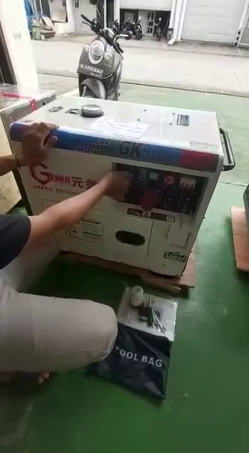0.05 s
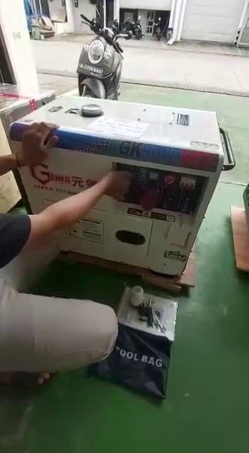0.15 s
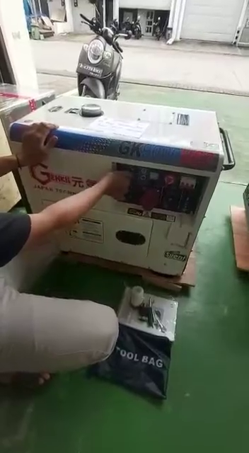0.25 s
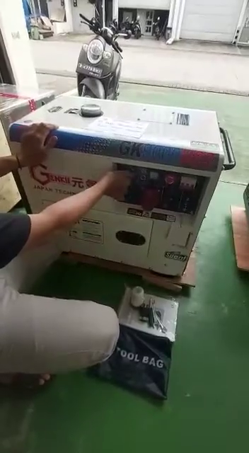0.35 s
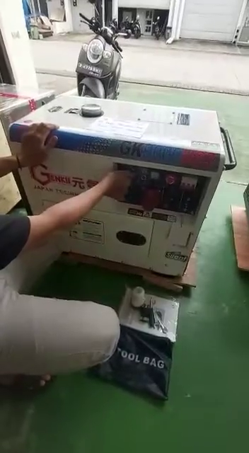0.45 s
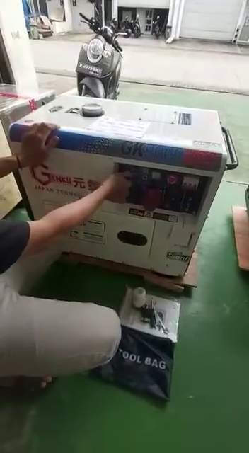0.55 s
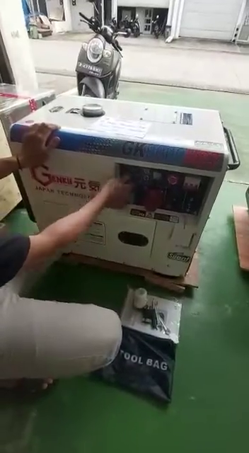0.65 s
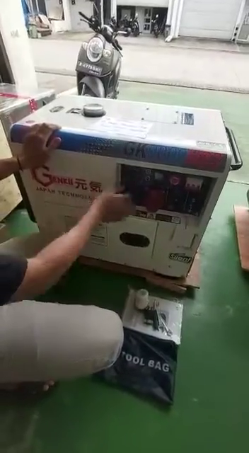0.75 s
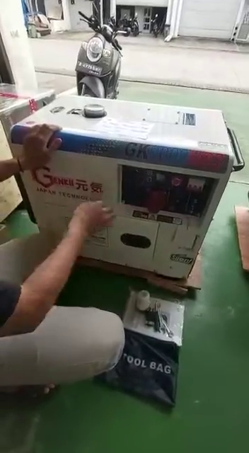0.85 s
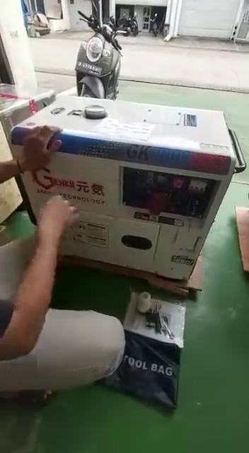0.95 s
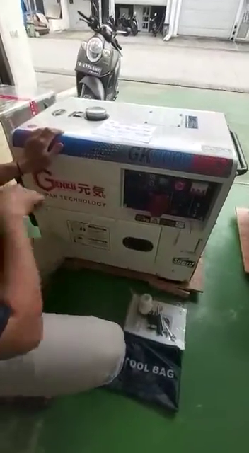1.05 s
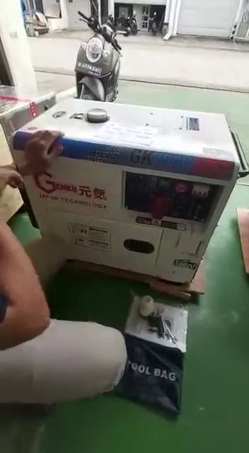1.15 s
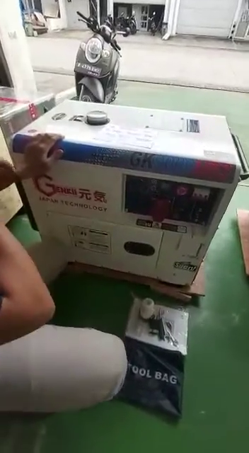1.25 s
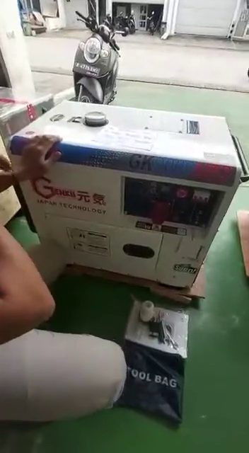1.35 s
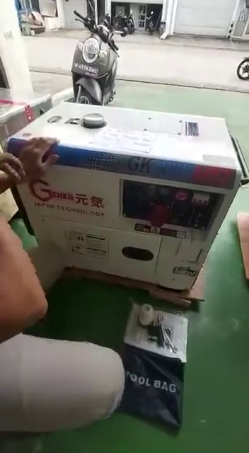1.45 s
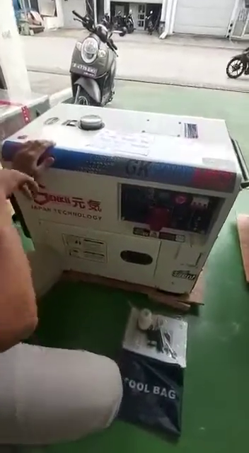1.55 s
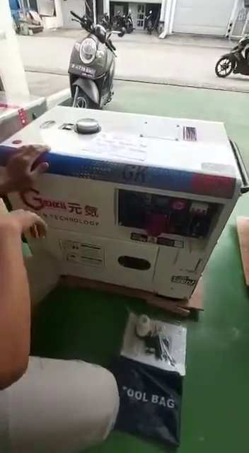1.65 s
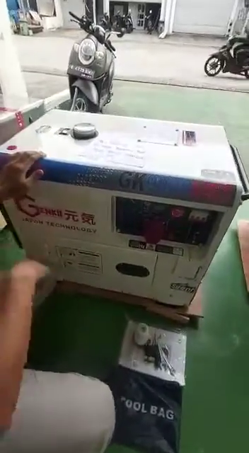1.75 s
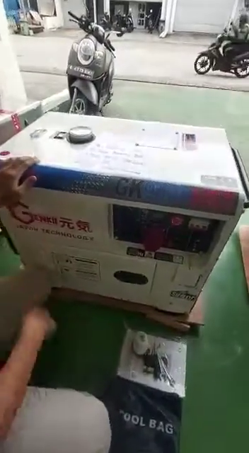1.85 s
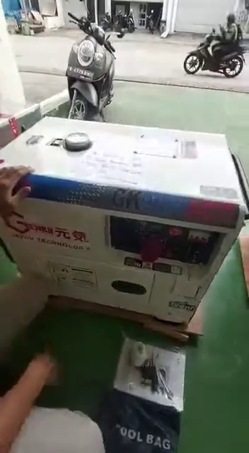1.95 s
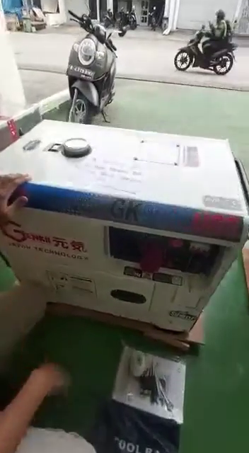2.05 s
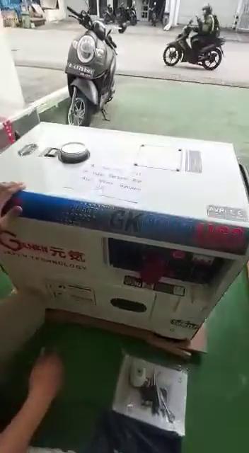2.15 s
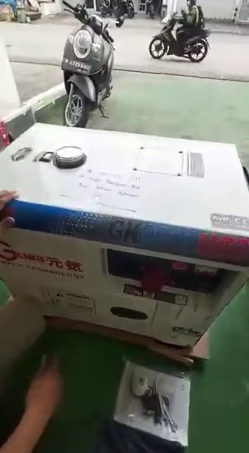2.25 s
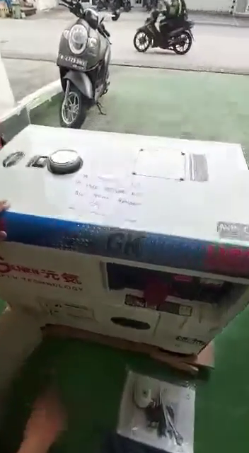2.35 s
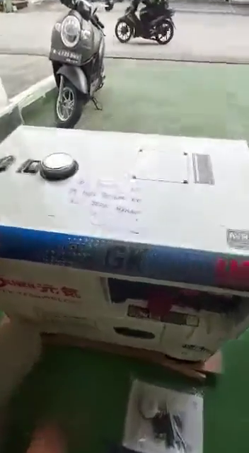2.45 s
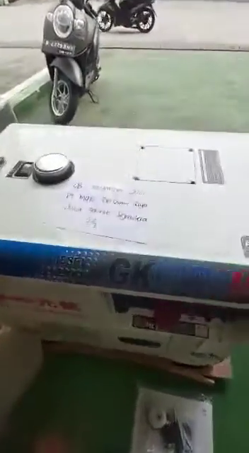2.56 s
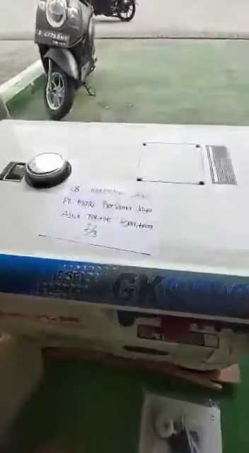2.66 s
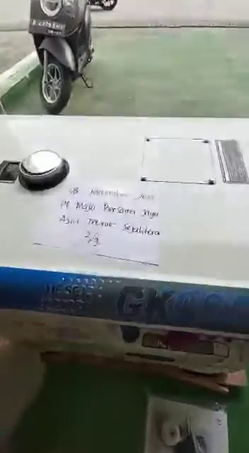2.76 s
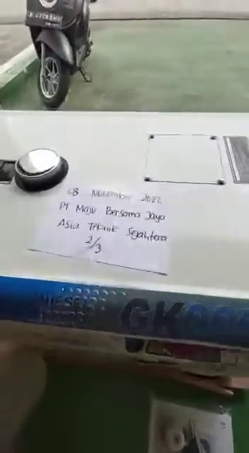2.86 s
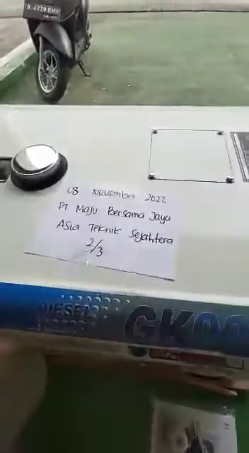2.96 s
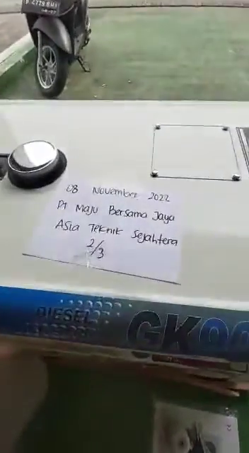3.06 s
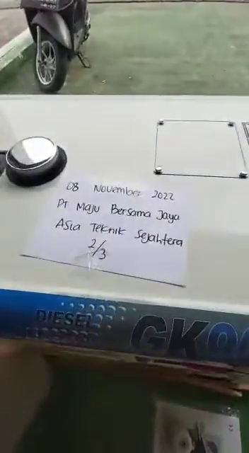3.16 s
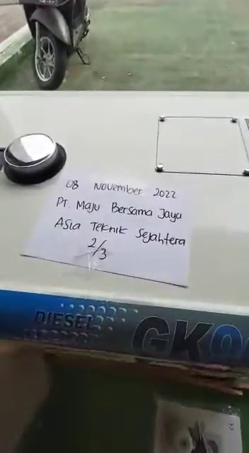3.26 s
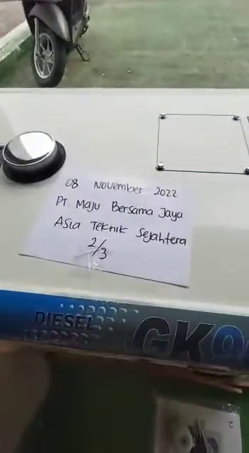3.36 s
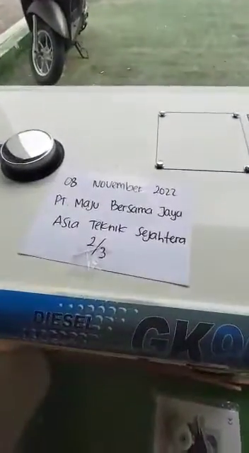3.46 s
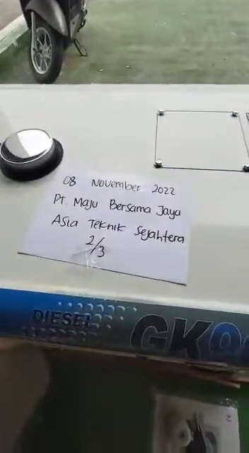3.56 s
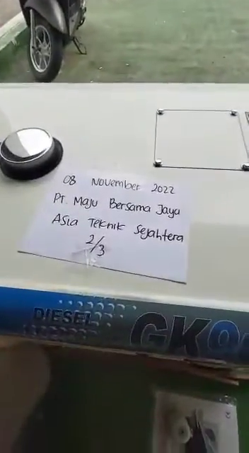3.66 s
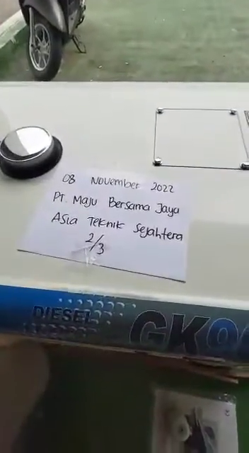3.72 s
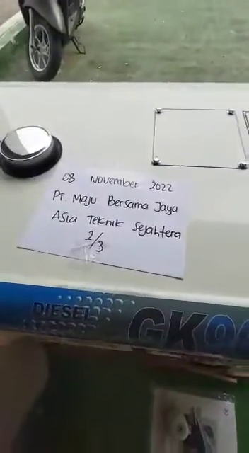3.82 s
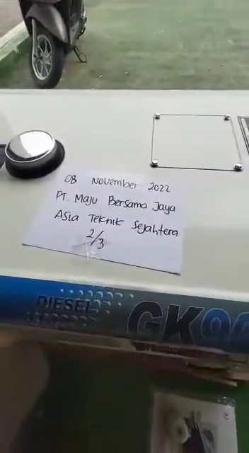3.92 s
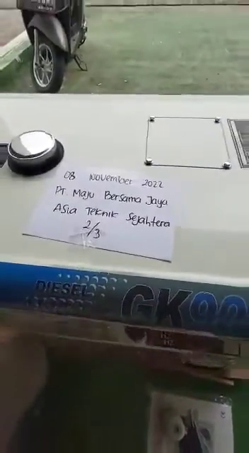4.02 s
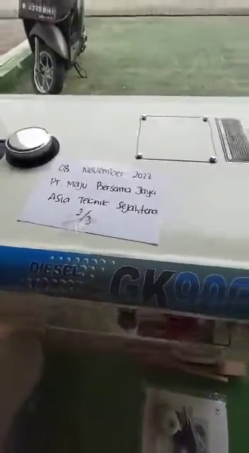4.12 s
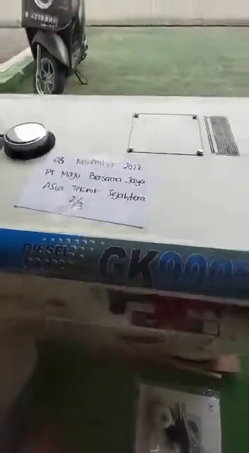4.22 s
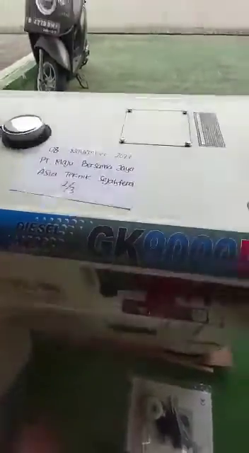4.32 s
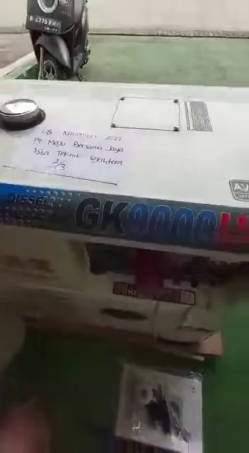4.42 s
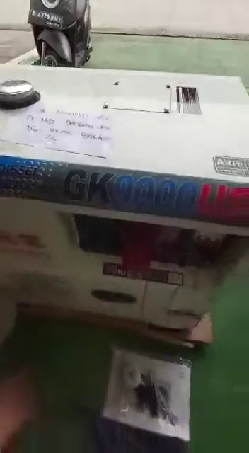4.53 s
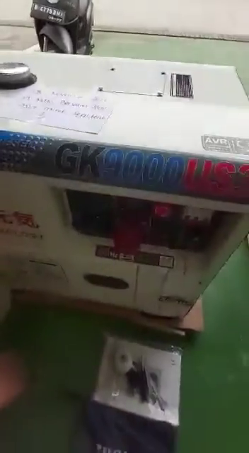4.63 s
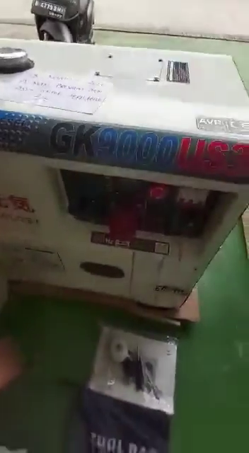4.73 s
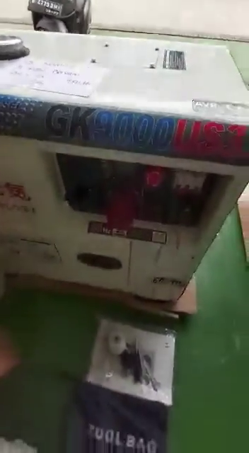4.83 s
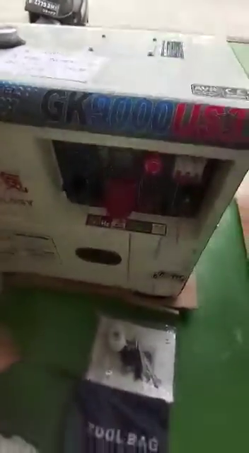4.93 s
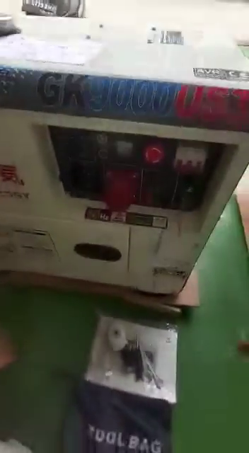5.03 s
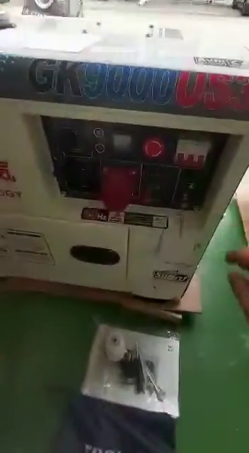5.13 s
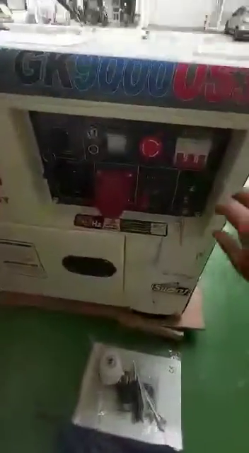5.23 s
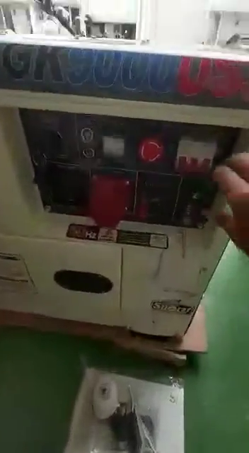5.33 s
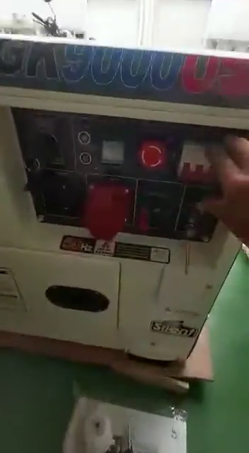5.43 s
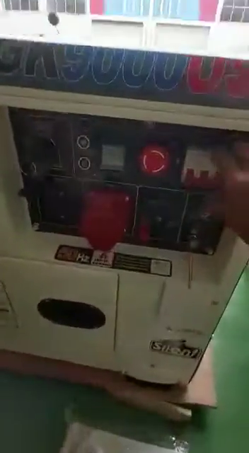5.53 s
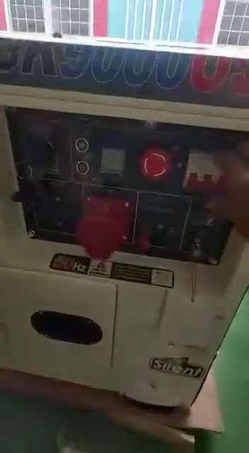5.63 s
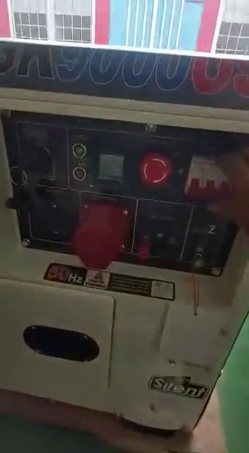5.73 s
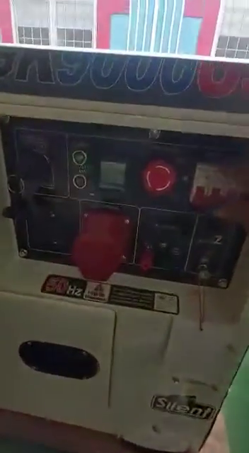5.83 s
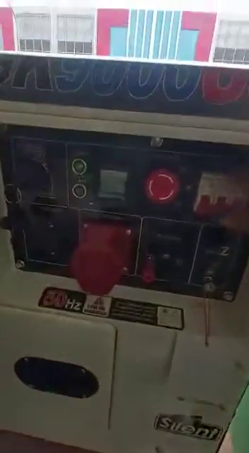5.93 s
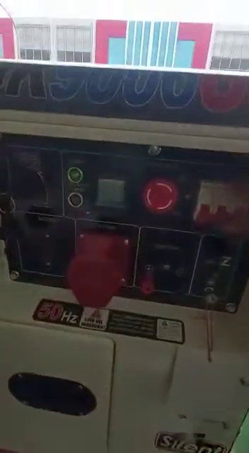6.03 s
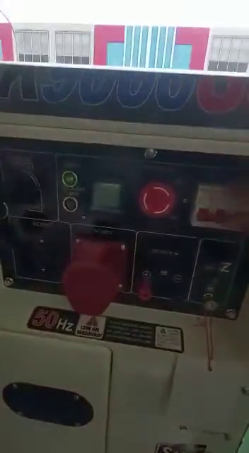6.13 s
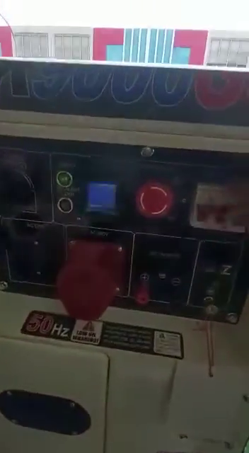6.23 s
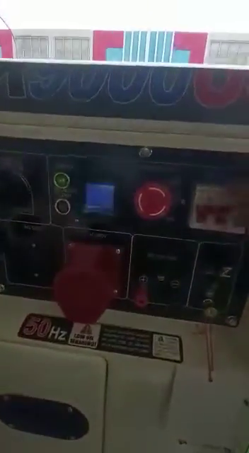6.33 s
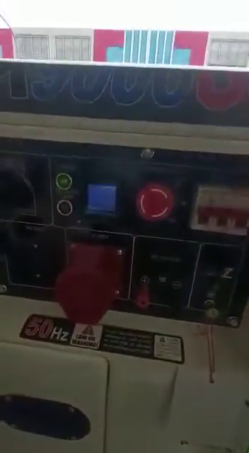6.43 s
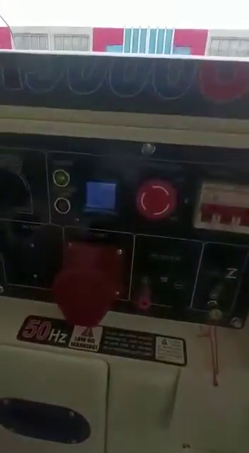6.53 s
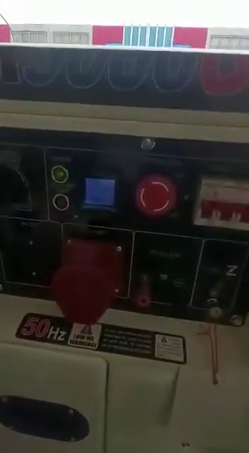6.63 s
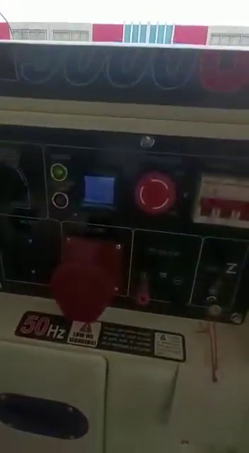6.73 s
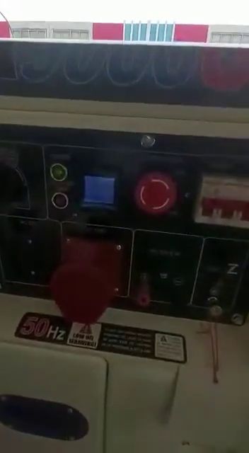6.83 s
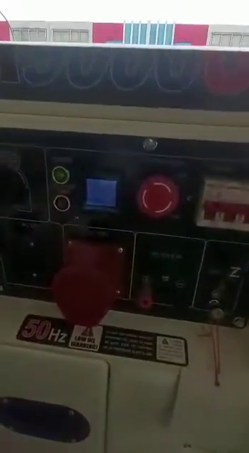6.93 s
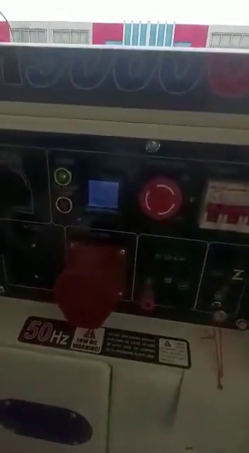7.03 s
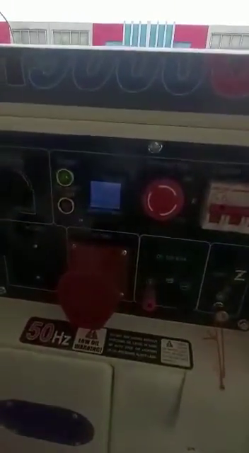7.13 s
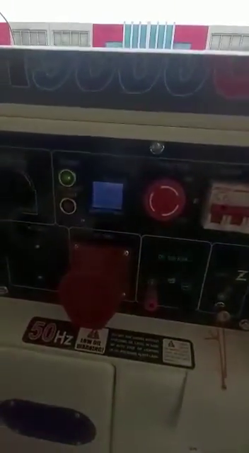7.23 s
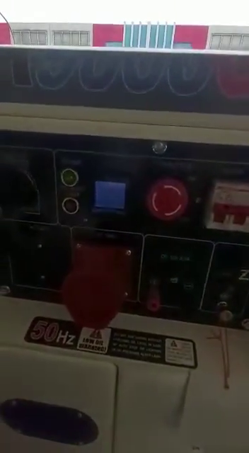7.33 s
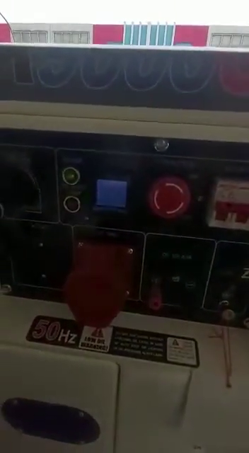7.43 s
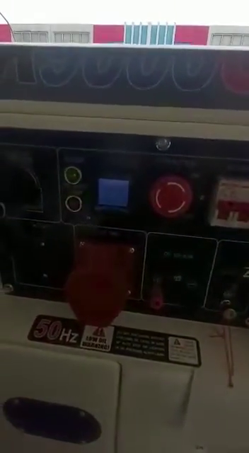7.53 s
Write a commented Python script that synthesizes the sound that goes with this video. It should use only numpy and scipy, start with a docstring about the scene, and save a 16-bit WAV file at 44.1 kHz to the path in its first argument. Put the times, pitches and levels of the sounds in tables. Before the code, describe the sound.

An electric starter thuds in and grinds briefly, and a single-cylinder diesel generator catches, knocking and clanking as it quickly gains speed. After about a second and a half it eases into constant running, with a low hum, exhaust throb and light metallic clatter. The microphone stays close, moving around the steel case in an open workshop, and one small switch click comes near the end.

```python
"""A single-cylinder diesel generator in a sheet-steel case starts in an open workshop.
The starter thuds in and whirrs, the engine lurches, and each firing slams the block: hard knocks come
faster and faster over a rising intake tone. At 1.5 s the governor cuts the fuel back and the set
drones, its case humming, its exhaust barking, its valves ticking. The listener moves over the lid
and down to the control panel, where a switch clicks at 6.2 s."""
import sys
import numpy as np
from scipy import signal
from scipy.fft import rfft, irfft
from scipy.io import wavfile
from scipy.ndimage import uniform_filter1d

SR = 44100
rng = np.random.default_rng(int(sys.argv[2]) if len(sys.argv) > 2 else 0)


def inscribe(sig):
    """Save sig as 16-bit PCM at rate SR to the path in sys.argv[1].

    A 1-D sig is mono; a 2-D sig holds one channel per row.
    Samples are clipped to [-1, 1] before scaling.
    """
    pcm = np.round(np.clip(np.atleast_2d(sig).T, -1, 1) * 32767)
    wavfile.write(sys.argv[1], SR, pcm.astype(np.int16))


N = 334278
T = np.arange(N) / SR
CRANK_HZ, SETTLED_HZ = 8.605, 26.18  # engine cycles per second
CUT_S, CUT_TAKES_S = 1.497, 0.26  # the governor cuts the fuel back

# blows within one four-stroke cycle: cycle_share, full_fuel_db, governed_db
BLOWS = [(.01, 0, 0), (.22, -10, -2), (.47, -13, -6.5), (.7, -19, -12)]


def undb(db):
    """Decibels to gain."""
    return 10 ** (np.asarray(db) / 20)


def curve(rows):
    """Join (time_s, value) points with straight lines."""
    return np.interp(T, *np.transpose(rows))


def ramp(start_s, length_s):
    """Rise evenly from 0 to 1 and stay there."""
    return np.clip((T - start_s) / length_s, 0, 1)


def swell(peak_s, length_s):
    """Rise to 1 and die away in a flat-topped bell."""
    return np.exp(-np.abs(2 * (T - peak_s) / length_s) ** 2.8)


def play(x, response):
    """Send a signal through an impulse response."""
    return signal.fftconvolve(np.atleast_2d(x), np.atleast_2d(response), axes=1)[:, :N]


def band(x, lo_hz, hi_hz):
    """Steep band-pass."""
    return signal.sosfilt(signal.butter(4, [lo_hz, hi_hz], "band", fs=SR, output="sos"), x)


def even(x, lo_hz, hi_hz, size=10100):
    """Ride the gain so that the slow level in one band stays at 1."""
    power = band(x.mean(0), lo_hz, hi_hz) ** 2
    return x / np.sqrt(uniform_filter1d(uniform_filter1d(power, size), size // 2) + 1e-12)


def body(colour, modes=(), size=16384):
    """Minimum-phase impulse response of a broad colour with resonances standing on it."""
    f = np.arange(size // 2 + 1) * SR / size + 1e-3
    hz, db = np.transpose(colour)
    gain = undb(np.interp(np.log(f), np.log(hz), db))
    for centre_hz, width_hz, boost_db in modes:
        gain = gain * (1 + (undb(boost_db) - 1) / (1 + (2 * (f - centre_hz) / width_hz) ** 2))
    cepstrum = irfft(np.log(gain))
    cepstrum[1:size // 2] *= 2
    cepstrum[size // 2 + 1:] = 0
    return irfft(np.exp(rfft(cepstrum)))


def ping(pitch_hz, width_hz):
    """One steel resonance: the wider it is, the sooner it dies."""
    t = T[:4096]
    return np.sin(2 * np.pi * pitch_hz * t) * np.exp(-np.pi * width_hz * t)


def bang(crack_s, tail_s, tail_db, rise_s):
    """Envelope of a blow that builds as the case takes it in, then rings on."""
    t = T[:8192]
    return (1 - np.exp(-t / rise_s)) * (np.exp(-t / crack_s) + undb(tail_db) * np.exp(-t / tail_s))


def rattle(hits, envelope, fresh):
    """Dense ringing after each hit: the fresh share is new each time, the rest repeats."""
    spectrum = rfft(rng.standard_normal(len(envelope)) * envelope)
    ring = irfft(spectrum / np.sqrt(uniform_filter1d(np.abs(spectrum) ** 2, size=9)))
    power = play(hits ** 2, envelope ** 2 / np.sum(envelope ** 2))
    spray = np.sqrt(np.abs(power)) * rng.standard_normal(N)
    return np.sqrt(1 - fresh) * play(hits, ring) + np.sqrt(fresh) * spray


def passing_rattle(hits, envelope, panel, fresh, spots=6):
    """A rattle whose pattern changes from spot to spot along the listener's path."""
    path = np.cumsum(np.abs(np.gradient(panel)))
    spot = path / path[-1] * (spots - 1)
    return sum(np.sqrt(np.maximum(1 - np.abs(spot - k), 0)) * rattle(hits, envelope, fresh)
               for k in range(spots))


def spread(mid, side, wide_hz):
    """Centred bass, wide treble."""
    side = signal.sosfilt(signal.butter(1, wide_hz, "high", fs=SR, output="sos"), side)
    return mid + side * np.array([[.8], [-.8]])


def speed():
    """Cycles per second: the engine catches, speeds up, overshoots a little and is governed."""
    catch_s, gain_hz_per_s, overshoot_hz, settle_s = .2036, 12.52, .255, 1.33
    free = CRANK_HZ + gain_hz_per_s * np.maximum(T - catch_s, 0)
    held_s = np.maximum(free - SETTLED_HZ - overshoot_hz, 0) / gain_hz_per_s
    return np.minimum(free, SETTLED_HZ + overshoot_hz * np.exp(-held_s / settle_s))


def revs():
    """Speed gained: 0 while cranking, 1 at full speed."""
    return np.clip((speed() - CRANK_HZ) / (SETTLED_HZ - CRANK_HZ), 0, 1)


def cycles():
    """Running count of engine cycles."""
    return np.cumsum(speed()) / SR


def strokes(share, scatter_db, jitter_s):
    """One impulse per engine cycle at a given share of it, each a little different."""
    count = cycles()
    due = np.arange(int(count[-1] - share) + 1) + share
    timing, force = rng.standard_normal((len(due), 2)).T
    at = (np.interp(due, count, T) + jitter_s * timing) * SR
    return np.bincount(np.clip(at, 0, N - 1).astype(int), undb(scatter_db * force), N)


def loudness(states_db, panel):
    """Gain of one part: it follows the speed on full fuel, and the side heard once governed."""
    cranking, full_speed, lid, front = states_db
    run_up = cranking + (full_speed - cranking) * revs() ** 3.7
    steady = lid + (front - lid) * panel
    return undb(run_up + (steady - run_up) * ramp(CUT_S, CUT_TAKES_S))


def drone(panel, governed):
    """Gas pulses through muffler and case: heave in the bass, bark above it, sheet hum on top."""
    # colour of the pulsation over the lid and at the panel: firing_multiple, level_db
    lid_orders = [(1, -37), (2, -31), (3, -8), (4, 3), (5, -18.5), (6, -12.5), (7, -9.5), (8, -26.5),
                  (9, -22.5), (10, -25), (11, -31), (12, -16), (13, -17.5), (14, -29.5), (15, -23),
                  (16, -43.5), (17, -36), (18, -28), (19, -32.5), (20, -39.5), (21, -26.5), (22, -58.5),
                  (23, -24), (24, -25.5), (25, -45), (26, -35), (27, -58)]
    panel_orders = [(1, -62.5), (2, -22.5), (3, -5.5), (4, 5), (5, -20), (6, -15), (7, -18), (8, -19.5),
                    (9, -23), (10, -29.5), (11, -20), (12, -21.5), (13, -18), (14, -28), (15, -31),
                    (16, -18.5), (17, -24.5), (18, -22.5), (19, -31.5), (20, -40), (21, -27.5), (22, -38),
                    (23, -27.5), (24, -38), (25, -29), (26, -48), (27, -60.5)]
    colours = [[(k * SETTLED_HZ, db) for k, db in orders] for orders in (lid_orders, panel_orders)]
    return (case_heave([colour[:8] for colour in colours], panel, governed)
            + exhaust_bark([colour[8:18] for colour in colours], panel, governed)
            + sheet_hum([colour[18:] for colour in colours], panel))[0]


def case_heave(colours, panel, governed):
    """Compression heaves the case near 100 Hz; at low speed the engine also rocks on its mounts."""
    # boom of the case at low speed: pitch_hz, level_db
    boom_colour = [(25, -39), (48, -17), (66, -4.5), (85, -4.5), (102, 1.5), (125, -7.5), (160, -1),
                   (195, -16), (235, -12.5), (600, -61), (4000, -115)]
    # weight of the heave: cranking_db, full_speed_db, lid_db, panel_db
    states_db = (-21.5, -13.5, -10.5, -9.5)
    hits = strokes(0.7956, scatter_db=0.43, jitter_s=.00006)
    rock = undb(-11) * strokes(0.38, scatter_db=3.5, jitter_s=0.001)
    rock = (rock + undb(-32.5) * rng.standard_normal(N)) * undb(-11 * revs())
    boom = even(play(hits + rock, body(boom_colour)), 60, 200)
    hits = hits + undb(-23.5) * rattle(hits, bang(0.02, 0.054, -13.5, rise_s=0.0043), fresh=0.65)
    hum = sum(weight * play(hits, body(colour + [(250, -56), (600, -85.5)]))
              for colour, weight in zip(colours, (1 - panel, panel)))
    heave = (1 - governed) * boom + governed * even(hum, 60, 200)
    return even(heave, 60, 160) * loudness(states_db, panel)


def exhaust_bark(colours, panel, governed):
    """The exhaust barks about half a cycle after each firing, rougher on full fuel."""
    # strength of the bark: cranking_db, full_speed_db, lid_db, panel_db
    states_db = (-28, -27, -27, -25)
    # its rise and fall as the listener moves: time_s, gain_db
    ride = [(1.65, 0), (2.2, -3), (2.7, 0.5), (4.9, 0.5), (5.7, 1.5), (6.6, 0.2), (7.58, 0.3)]
    puffs = strokes(.44, scatter_db=0, jitter_s=.00008)
    rasp = rattle(puffs, bang(0.0064, 0.16, -2.8, rise_s=0.0012), fresh=0.87)
    puffs = puffs + undb(-11.7 * governed) * rasp
    close = panel ** 1.9  # the front's colour takes over only close to the panel
    low_skirt, high_skirt = [(120, -71.5), (205, -43)], [(520, -45.5), (1500, -96.5)]
    bark = sum(weight * play(puffs, body(low_skirt + colour + high_skirt))
               for colour, weight in zip(colours, (1 - close, close)))
    return even(bark, 250, 580) * loudness(states_db, panel) * undb(curve(ride))


def sheet_hum(colours, panel):
    """Each firing shakes lid and front; their hums partly cancel along the edge between them."""
    # strength of the hum: cranking_db, full_speed_db, lid_db, panel_db
    states_db = (-31.5, -41, -31, -31)
    arrival_shares = 0.1109, .34  # when in the cycle the lid and the front are heard
    edge_db, edge_place, edge_width = -3.5, 0.37, .2
    low_skirt, high_skirt = [(250, -66.5), (460, -40)], [(790, -57), (1800, -94)]
    hum = 0
    for colour, weight, share in zip(colours, (1 - panel, panel), arrival_shares):
        shake = strokes(share, scatter_db=.8, jitter_s=.00004)
        shake = shake + undb(-10) * rattle(shake, bang(.014, .07, -7, rise_s=.005), fresh=1)
        hum = hum + weight * play(shake, body(low_skirt + colour + high_skirt))
    edge_dip = undb(edge_db * np.exp(-((panel - edge_place) / edge_width) ** 2))
    return even(hum, 410, 840) * loudness(states_db, panel) * edge_dip


def knock():
    """Full fuel: every firing slams the block, and piston and valves rattle after it."""
    # colour of block and case: pitch_hz, level_db
    colour = [(150, -27.5), (250, -4.5), (360, -12), (458, -12.5), (594, -7.5), (732, -9), (840, -5.5),
              (932, -11.5), (1230, -9.5), (1510, -17.5), (2460, -22), (2920, -30), (7400, -37), (8500, -49),
              (15700, -51)]
    # their ringing: pitch_hz, width_hz, boost_db
    modes = [(470, 34, 11), (606, 25, 14), (834.5, 20, 7.5), (868, 6.5, 10.5), (1230, 58, 3), (1331, 21, 8),
             (2495, 30, 5.5), (3400, 46, 6)]
    first_firing_s, cold_s, slam_lag_s = .1, 0.19, 0.004066
    hits = sum(undb(db) * strokes(share, scatter_db=0.16, jitter_s=.0003) for share, db, _ in BLOWS)
    hits = hits * undb(np.where(T < first_firing_s, -1, 0))
    mid = rattle(hits, bang(.011, .06, -14, rise_s=.0035), fresh=0.17)
    side = rattle(hits, bang(.012, .07, -13, rise_s=.003), fresh=0.41)
    sheet_slam = undb(-10) * np.interp(T - slam_lag_s, T, band(hits, 506, 1270))
    flywheel_fan = undb(-33) * band(rng.standard_normal((2, N)), 1240, 22000)
    knocks = play(spread(mid, side, wide_hz=740) + sheet_slam + flywheel_fan, body(colour, modes))
    # the first firings hit harder in the cold cylinder
    cold_db = 2.5 * np.exp(-np.abs(T - first_firing_s) / cold_s) * (T >= first_firing_s)
    return even(knocks, 380, 2980) * undb(-22 + 3.5 * revs() + cold_db)


def clatter(panel):
    """Light fuel: injector, piston and valves tick through the case, coloured by the side heard."""
    # colour of the lid and of the front: pitch_hz, level_db
    lid_colour = [(450, -29.5), (770, -2), (966, -6.5), (1320, -11.5), (1520, -19.5), (1840, -26.5),
                  (2280, -23.5), (2930, -31.5), (4170, -34.5), (4500, -33.5), (5400, -39.5), (7200, -40.5),
                  (8400, -55), (15700, -53.5)]
    front_colour = [(450, -30), (770, -8), (885, -11), (1140, -13), (1240, -11), (1480, -18.5), (2340, -23),
                    (2650, -24), (3920, -31), (4620, -34.5), (6090, -34.5), (8040, -47), (15700, -58)]
    # their ringing: pitch_hz, width_hz, boost_db
    lid_modes = [(799, 40, 7.3), (1310, 190, 4.3), (1965, 110, 6.5), (2260, 80, 3.3), (3300, 44, 2),
                 (4340, 120, 2.2)]
    front_modes = [(872, 75, 3.2), (1254, 33, 3.4), (2060, 340, 3.1), (2360, 190, 4.1), (3350, 140, 2.2),
                   (5930, 30, 2.4)]
    hits = sum(undb(db) * strokes(share, scatter_db=0.9, jitter_s=.00005) for share, _, db in BLOWS)
    mid = passing_rattle(hits, bang(.0045, .025, -15, rise_s=.0012), panel, fresh=0.15)
    side = rattle(hits, bang(0.007, 0.021, -8, rise_s=0.0018), fresh=0.73)
    vent_air = undb(-23.5) * band(rng.standard_normal((2, N)), 1415, 17000)
    inside = spread(mid, side, wide_hz=1100) + vent_air
    lid = even(play(inside, body(lid_colour, lid_modes)), 1500, 8000)
    front = even(play(inside, body(front_colour, front_modes)), 1200, 8000)
    return even((1 - panel) * lid + panel * front, 1730, 9600) * undb(-43.5 + 1.5 * panel)


def clank():
    """Firings ring loose steel parts; each swells and fades as load and listening spot change."""
    # steel parts: pitch_hz, width_hz, cycle_share, level_db, chatter_db, peak_s, length_s
    parts = [(604, 18, 0.0906, -28, -12, 0.31, 0.65), (616, 12, .3, -27.5, -9, 0.45, 1.06),
             (1320, 240, .02, -29.5, 0, .4, .85), (3440, 66, .01, -44.5, 1, .8, .55),
             (1230, 110, .05, -30, -0.5, 1.16, 0.77), (2460, 220, 0.0197, -39.5, 3, 1.3, 0.68),
             (543, 26, 0.154, -38, -15.5, 1.95, 1), (840, 40, 0.2036, -35, -9, 2.01, 0.54),
             (1298, 64, 0.063, -39.5, -3.5, 2.7, .8), (602.5, 42, .07, -43, -12, 2.65, 1.3),
             (4470, 110, .03, -53, 5, 3.5, 2.2), (808, 63, 0.219, -37.5, -13, 2.98, 2.03),
             (1270, 130, .05, -35.5, -3, 4.65, 1.0), (832, 79, 0.2485, -37, -9, 4.55, 0.68),
             (604.5, 18, .3, -33, -14, 5.04, 0.88), (658, 25, 0.29, -34.5, -17, 5.3, 0.9),
             (665, 110, 0.38, -37.5, 4.5, 5.6, 0.68), (1320, 52, 0.1012, -39, -3.5, 5.62, 1.0),
             (3324, 190, .02, -52.5, 3.5, 6.5, 2.6), (3990, 190, .02, -51.5, 6, 6.6, 4.5),
             (2350, 100, .03, -52, 4.5, 6.7, 2.2), (1215, 20, 0.1356, -42.5, -13.5, 7.0, 1.8),
             (1268, 42, 0.101, -42.5, -4, 7.1, 1.1)]
    chatter_s, attack_s = .03, 0.0035
    attack = 1 - np.exp(-T[:4096] / attack_s)
    rate, count = speed(), cycles()
    clanks = 0
    for hz, width_hz, share, db, chatter_db, peak_s, length_s in parts:
        hits = strokes(share, scatter_db=1.2, jitter_s=.00002)
        since_hit_s = ((count - share) % 1) / rate
        chatter = rng.standard_normal((2, N)) * np.exp(-since_hit_s / chatter_s)
        hits = hits + undb(chatter_db) * chatter * hits.std() / chatter.std()
        ring = play(hits, ping(hz, width_hz) * attack)
        clanks = clanks + ring / ring.std() * undb(db) * swell(peak_s, length_s)
    return clanks


def starter():
    """The pinion thuds in and grinds; the motor groans until the key is let go, then coasts."""
    # colour of the pinion on the flywheel: pitch_hz, level_db
    gears = [(500, -33), (1500, -2), (4000, -1), (7300, -3), (8600, -15), (16000, -27)]
    key_off_s, load_s, thud_hz, thud_decay_s = .53, 0.193, 302, 0.018
    released_s = np.maximum(T - key_off_s, 0)
    thud = np.sin(2 * np.pi * thud_hz * T) * np.exp(-T / thud_decay_s) * ramp(0, 0.012) * undb(-13)
    grind = even(play(rng.standard_normal((2, N)), body(gears)), 1000, 8000)
    grind = grind * undb(-44.5 - 402 * released_s)
    motor_hz = 216 + 17.7 * T
    groan = np.sin(2 * np.pi * np.cumsum(motor_hz) / SR) * undb(-20.5 - 65 * released_s)
    whirr = even(band(rng.standard_normal((1, N)), 218, 259), 180, 270)
    whirr = whirr * undb(-26.5) * ramp(key_off_s, 0.23) * (1 - revs() ** 4)
    return thud + (grind + groan + whirr) * ramp(0, load_s)


def lurch():
    """The engine lurches on its mounts in the first slow turns, and the case booms."""
    # booms: peak_s, pitch_hz, level_db, length_s
    booms = [(.075, 97, -16, 0.066), (0.221, 108, -14, .11), (0.407, 105, -21, 0.073),
             (0.574, 98, -20, 0.079)]
    return sum(np.sqrt(2) * undb(db) * np.sin(2 * np.pi * hz * (T - peak_s)) * swell(peak_s, length_s)
               for peak_s, hz, db, length_s in booms)


def intake():
    """The seventh multiple of the firing rate glides up through the air intake until the fuel cut."""
    # resonances of the intake: pitch_hz, q, level_db
    modes = [(108.6, 5.5, -13), (146, 4.6, -18)]
    hz = 7 * speed()
    resonance = sum(undb(db) / (1 + 1j * q * (hz / centre - centre / hz)) for centre, q, db in modes)
    tone = np.sqrt(2) * np.imag(resonance * np.exp(2j * np.pi * np.cumsum(hz) / SR))
    return tone * ramp(start_s=0.49, length_s=0.19) * (1 - ramp(CUT_S, CUT_TAKES_S))


def throb():
    """The exhaust throbs on two rising harmonics as the engine pulls hardest."""
    phase = 2 * np.pi * cycles()
    tones = undb(-26) * np.sin(3 * phase) + undb(-20.5) * np.sin(4 * phase)
    return np.sqrt(2) * tones * swell(peak_s=1.354, length_s=.48)


def injector():
    """Each full shot of fuel sets the steel of the injector and its pipe ringing."""
    # bright ring of the steel: pitch_hz, width_hz, level_db
    modes = [(9448, 55, 0), (13194, 90, 0), (15390, 130, -4)]
    ring = sum(undb(db) * ping(hz, width_hz) for hz, width_hz, db in modes)
    shots = strokes(0.018, scatter_db=0.5, jitter_s=0.00026)
    chatter = [rattle(shots, bang(0.0035, 0.034, -7, rise_s=.0005), fresh=0.51) for _ in range(2)]
    return undb(-42.5) * play(np.vstack(chatter), ring)


def needle(panel):
    """The injector needle gives a dry click just before each firing."""
    # strength of the click: cranking_db, full_speed_db, lid_db, panel_db
    states_db = (-55, -48, -62, -57.5)
    decay_s = 0.0017
    envelope = play(strokes(0.98, scatter_db=.6, jitter_s=.00005), np.exp(-T[:1024] / decay_s))
    clicks = band(envelope * rng.standard_normal((2, N)), 2600, 5500)
    return even(clicks, 2000, 8900) * loudness(states_db, panel)


def switch():
    """Two tiny snaps of a spring contact in a plastic housing."""
    # snaps of the contact: start_s, level_db
    snaps = [(6.209, -31), (6.212, -27.5)]
    envelope = sum(undb(db) * (T >= s) * np.exp(-np.abs(T - s) / 0.0019) for s, db in snaps)
    housing = body([(800, -22), (3200, 3), (5000, 4), (8000, -5), (15000, -10)], [(4900, 1200, 5)])
    return play(rng.standard_normal((2, N)) * envelope, housing)


def scene():
    """The hard run-up gives way to governed running while the listener moves around the case."""
    # listener's path: time_s, place (0 over the lid, 1 at the panel)
    path = [(0, 0.81), (2.1, 0.61), (2.7, 0.002), (4.2, 0.17), (4.7, 0.5), (5.15, 0.55), (5.5, 0.81),
            (7.58, 0.92)]
    panel = curve(path)
    light_share = 0.11  # a little of the light running sound is there from the start
    governed = light_share + (1 - light_share) * ramp(CUT_S, CUT_TAKES_S)
    full_fuel = (1 - governed) ** .7 * (knock() + injector())
    engine = full_fuel + np.sqrt(governed) * clatter(panel) + clank() + needle(panel)
    bass = drone(panel, governed) + intake() + throb() + lurch()
    left_lag_s = 0.00025
    stereo_bass = np.array([np.interp(T - left_lag_s, T, bass), bass])
    return stereo_bass + engine + starter() + switch()


def record(dry):
    """Tilt the treble to the right and cut the top above 15.8 kHz."""
    # stereo balance: pitch_hz, left_minus_right_db
    balance = [(60, -.8), (200, -.6), (380, .6), (700, -1.5), (1290, -1.6), (2380, -5), (4400, -10),
               (8100, -17.5), (15000, -16)]
    hz, db = np.transpose(balance)
    f = np.arange(N // 2 + 1) * SR / N + 1
    ratio = undb(np.interp(np.log(f), np.log(hz), db))
    gains = 2 * np.array([ratio, np.ones_like(ratio)]) / (1 + ratio)
    heard = irfft(rfft(dry) * gains, N)
    return signal.sosfilt(signal.ellip(10, .2, 80, 15800, fs=SR, output="sos"), heard)


dry = scene()
out = record(dry)
inscribe(out)
```